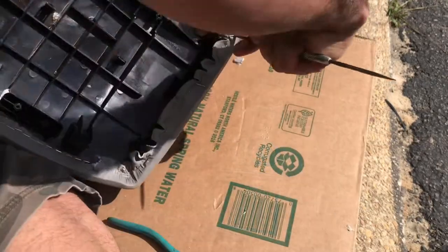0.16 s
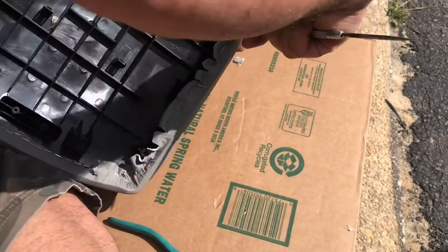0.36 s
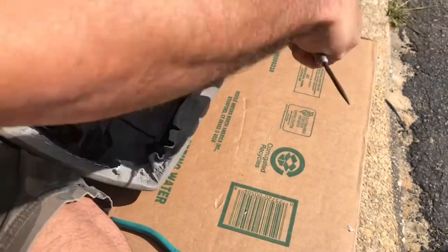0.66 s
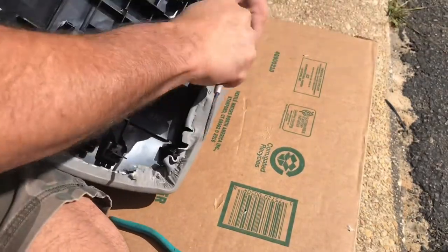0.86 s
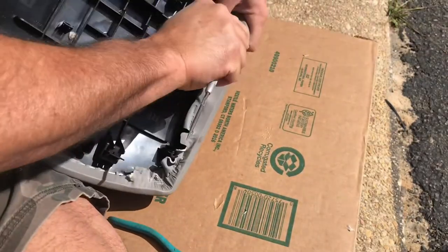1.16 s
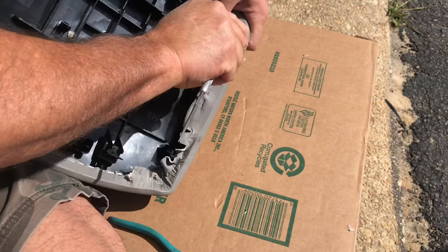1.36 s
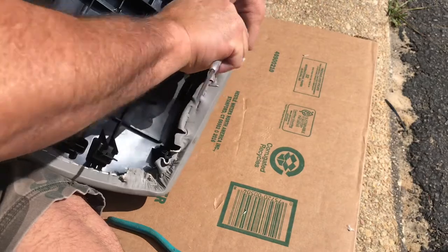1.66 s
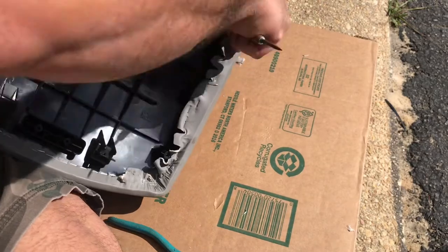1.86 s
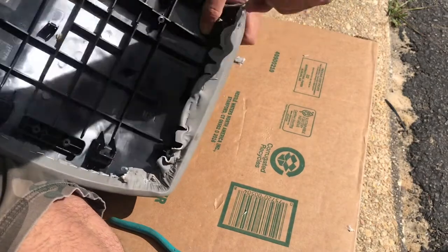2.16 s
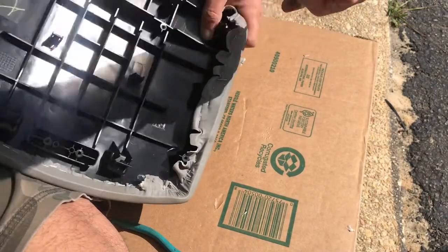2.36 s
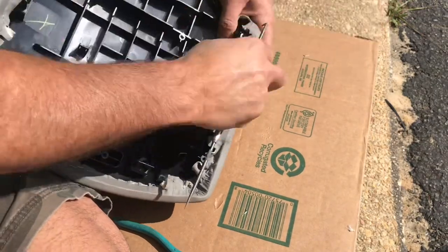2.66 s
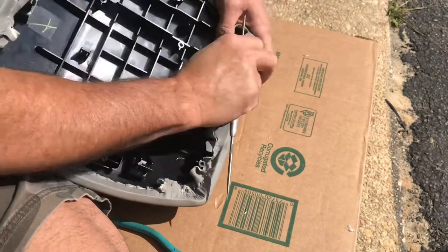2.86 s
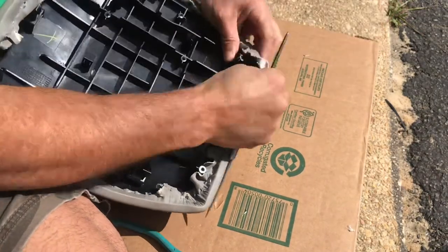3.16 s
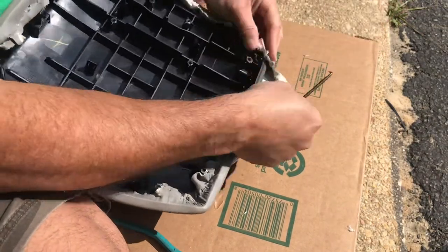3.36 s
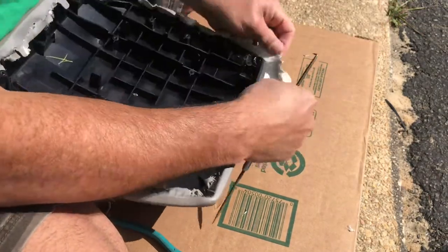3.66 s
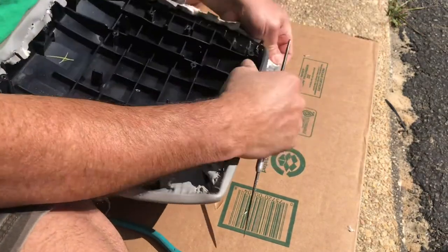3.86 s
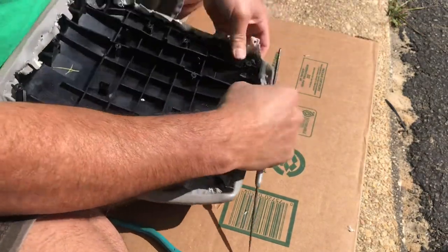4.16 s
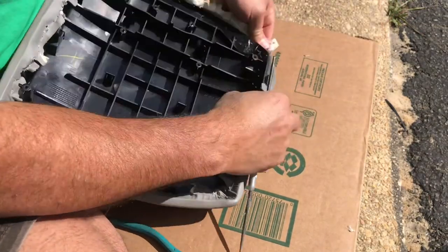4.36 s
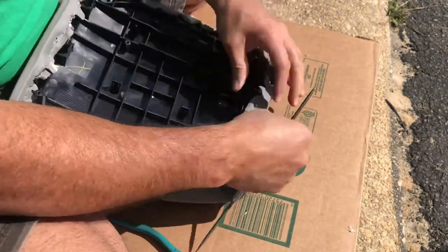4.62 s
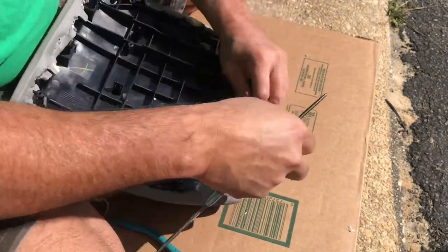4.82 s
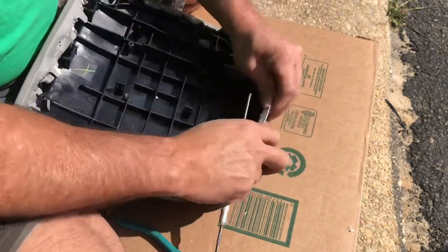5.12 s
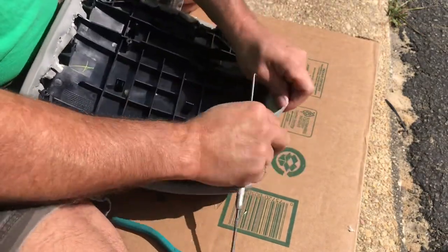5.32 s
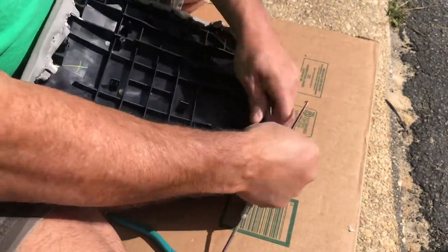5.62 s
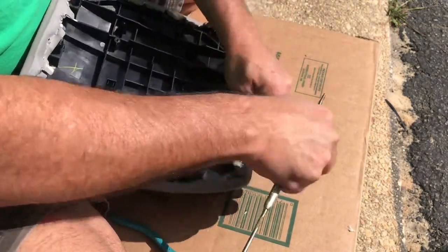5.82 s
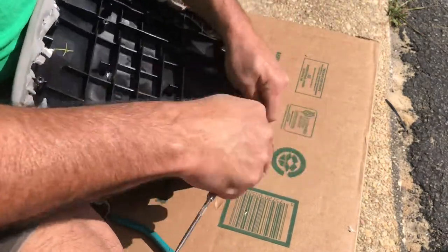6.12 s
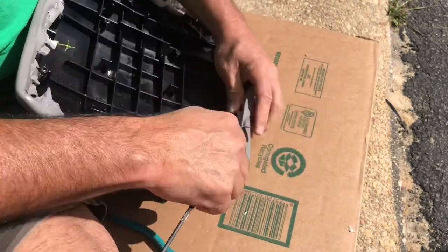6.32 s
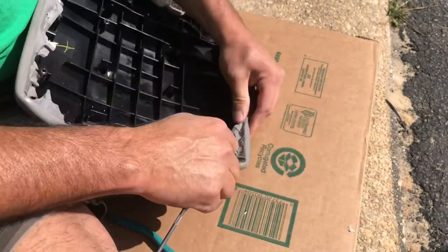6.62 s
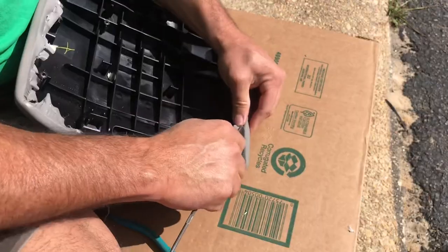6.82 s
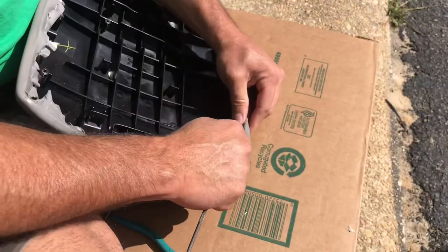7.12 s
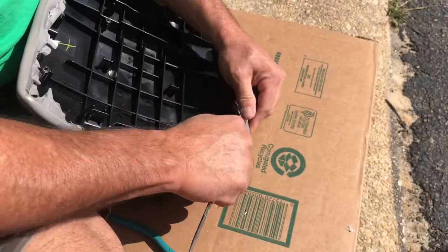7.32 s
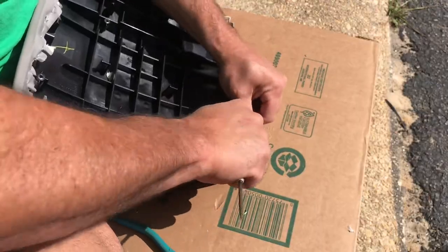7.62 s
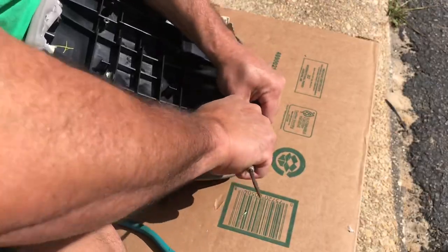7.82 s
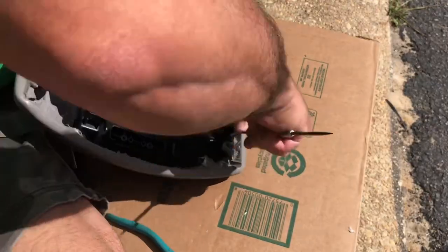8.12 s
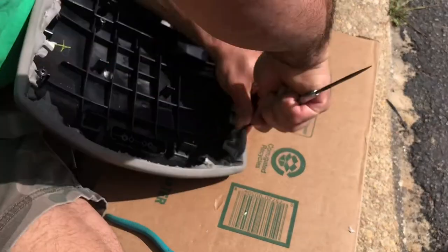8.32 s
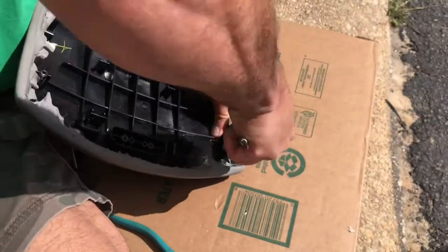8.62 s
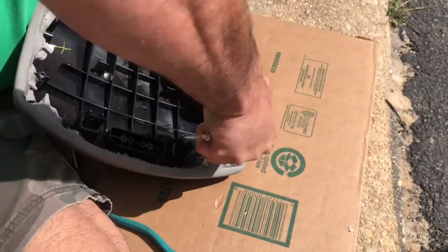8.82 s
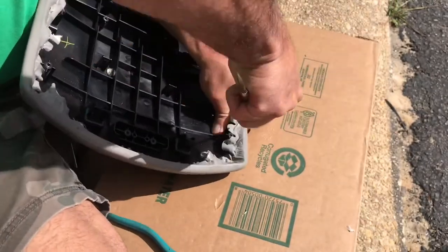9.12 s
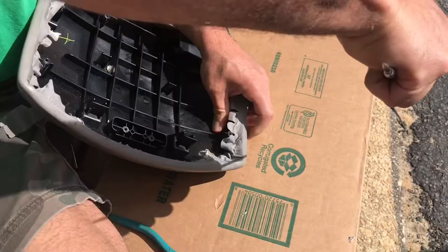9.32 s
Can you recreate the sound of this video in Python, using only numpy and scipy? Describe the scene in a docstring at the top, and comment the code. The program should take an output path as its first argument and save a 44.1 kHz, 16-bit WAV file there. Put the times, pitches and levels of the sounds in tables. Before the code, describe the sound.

Outdoors, close to the microphone, a metal pick works staples out of a hollow plastic seat pan on cardboard. A quick snap comes early, a denser cracking burst around two seconds, then light ticks, scrapes and soft rubbing. The pan judders down midway, and loud cracks and a thump come near nine seconds. A bird trills through the first four seconds, others chirp, over a low airy hush.

```python
"""A soft outdoor hush and shifting hands, as shaped noise, lie under it all; a small bird opens with a trill.
From the start distant twitters recur, each note a gliding sine; later nearer birds chirp in falling phrases.
A steel pick soon pries staples from a hollow plastic seat pan lying on cardboard, close by: sudden releases
ring the modes of the pan. Strokes over the rim scrape as stick-slip grains; stray touches fall at random.
Later, soft shoves make the pan wobble on the cardboard, and it lands twice, juddering the first time."""
import sys
import numpy as np
from scipy import signal
from scipy.fft import rfft, irfft, next_fast_len
from scipy.io import wavfile
from scipy.ndimage import uniform_filter1d

SR = 44100
rng = np.random.default_rng(int(sys.argv[2]) if len(sys.argv) > 2 else 0)


def inscribe(sig):
    """Save sig as 16-bit PCM at rate SR to the path in sys.argv[1].

    A 1-D sig is mono; a 2-D sig holds one channel per row.
    Samples are clipped to [-1, 1] before scaling.
    """
    pcm = np.round(np.clip(np.atleast_2d(sig).T, -1, 1) * 32767)
    wavfile.write(sys.argv[1], SR, pcm.astype(np.int16))


N = 418068
TIME = np.arange(N) / SR

# hands, knee and cardboard shifting, before each layer's trim:
# t/s, rumble level/dB, rub level/dB, vinyl rustle level/dB
HANDLING_LEVELS = [(0.0, -62, -64, -71), (0.63, -58.5, -60.5, -66), (1.08, -59.5, -64, -74.5),
                   (2.17, -67.5, -63.5, -75), (2.4, -73, -60, -61), (2.69, -64.5, -59, -71.5),
                   (3.67, -53, -60, -61), (3.93, -46, -60, -66), (4.59, -60, -57.5, -66),
                   (4.86, -51.5, -58.5, -71.5), (5.41, -52.5, -59.5, -67), (5.6, -45.5, -56.5, -63),
                   (5.81, -62, -54.5, -67.5), (6.15, -54.5, -55.5, -64.5), (7.02, -56, -63, -73),
                   (7.44, -58.5, -61, -72.5), (7.92, -48, -59.5, -74.5), (8.24, -53.5, -59, -75.5),
                   (8.95, -56.5, -59, -76), (9.08, -44, -58, -70.5), (9.48, -63, -58, -70)]
# modes of the ribs and panels of the pan: f/Hz, relative level/dB, decay time t60/s
PANEL_MODES = [(590.4, -1, 0.089), (672, 4.5, 0.028), (841, -4.5, 0.12), (1147, -7.5, 0.089),
               (1375, -10, 0.24), (1604, -4, 0.047), (1837, 4, 0.037), (2412, -5, 0.12), (3250, -10, 0.024),
               (3795, 0, 0.043), (4590, -1, 0.051), (12700, -16, .015)]
# chatter of a light contact of the steel tip
TICK_MS = 6.3


def gain_of(db):
    """Level definition: decibels to amplitude ratio."""
    return 10 ** (np.asarray(db) / 20)


def evened(x):
    """Normalization: scales a signal to rms 1."""
    return x / np.sqrt(np.mean(x ** 2) + 1e-20)


def add(mix, s, sound):
    """Superposition: mixes a sound in at time s."""
    part = mix[max(round(s * SR), 0):][:len(sound)]
    part += sound[:len(part)]


def band(x, lo_hz, hi_hz, order=3):
    """Causal band-pass filtering."""
    return signal.sosfilt(signal.butter(order, [lo_hz, hi_hz], "band", fs=SR, output="sos"), x)


def coloured(x, points):
    """Spectral shaping: weights the spectrum of x by a level curve over log frequency, at rms 1."""
    hz, db = np.transpose(points)
    size = next_fast_len(len(x), True)
    shape = np.interp(np.log(np.fft.rfftfreq(size, 1 / SR) + 1), np.log(hz), db)
    return evened(irfft(rfft(x, size) * gain_of(shape), size)[:len(x)])


def wander(per_s, t=TIME):
    """Random modulation: straight lines between normal random knots, per_s of them a second."""
    knots = rng.standard_normal(4000)
    return np.interp(t * per_s, np.arange(len(knots)), knots)


def grains(per_s, spread_db, smooth):
    """Stick-slip friction: sparse grains of uneven size over a bed of finer friction noise."""
    sizes = gain_of(spread_db * np.minimum(rng.exponential(1, N), 4)) * rng.standard_normal(N)
    slips = evened(sizes * (rng.random(N) < per_s / SR))
    return slips + smooth * rng.standard_normal(N)


def swells(rows):
    """Amplitude envelopes: one Gaussian rise and fall for each (middle s, length s, dB)."""
    out = np.zeros(N)
    for middle, length, db in rows:
        t = np.arange(-1.5 * length, 1.5 * length, 1 / SR)
        add(out, middle + t[0], gain_of(db) * np.exp(-(2 * t / length) ** 2))
    return out


def hush(db=-56.5):
    """Broadband ambience: distant traffic and leaves as shaped noise of slowly varying level."""
    # spectrum: f/Hz, relative level/dB
    hush_spectrum = [(25, -24), (50, -4.5), (110, 1.5), (200, -6), (300, -11.5), (500, -24), (1000, -26),
                     (2000, -26.5), (4500, -26), (6500, -27.5), (8000, -42), (10500, -58), (15500, -63)]
    return gain_of(db + 2.3 * wander(1.71)) * coloured(rng.standard_normal(N), hush_spectrum)


def handling(rumble_trim_db=1.5, rub_trim_db=0.0, rustle_trim_db=4.0):
    """Friction noise: cardboard rumbles, skin rubs and vinyl crinkles as the hands shift."""
    # spectra of the three layers: f/Hz, relative level/dB
    rumble_spectrum = [(20, -20), (35, 0), (55, 12), (90, -4), (160, -4), (300, -21.5), (600, -56),
                       (2000, -82)]
    rub_spectrum = [(60, -17), (200, 2.5), (320, 2.5), (450, -6.5), (700, -4.5), (1200, -5.5),
                    (3000, -10.5), (6000, -20), (16000, -30)]
    rustle_spectrum = [(500, -24), (3000, 2.5), (6000, 2), (8500, 1), (10400, -3), (12500, 0), (16000, -6)]
    s, *levels = np.transpose(HANDLING_LEVELS)
    rumble_db, rub_db, rustle_db = (np.interp(TIME, s, level) for level in levels)

    crinkle = grains(1500, 3., 1.8) * gain_of(1.6 * wander(40))
    rumble_gain = gain_of(rumble_db + rumble_trim_db + 2.6 * wander(13))
    rumble = rumble_gain * coloured(rng.standard_normal(N), rumble_spectrum)
    rub_gain = gain_of(rub_db + rub_trim_db + 2.8 * wander(35))
    rub = rub_gain * coloured(grains(700, 3.9, 1.5), rub_spectrum)
    rustle = gain_of(rustle_db + rustle_trim_db) * coloured(crinkle, rustle_spectrum)
    return rumble + rub + rustle


def whistle(hz, overtone_db):
    """Frequency modulation: one nearly pure bird note along a pitch curve, with a weak octave."""
    phase = 2 * np.pi * np.cumsum(hz) / SR
    tone = np.sin(phase) + gain_of(overtone_db) * np.sin(2 * phase)
    return tone * signal.windows.tukey(len(hz), .6)


def birds(trill_db=-51.5, trill_hz=6248.0, fade_db=-4.5, count=51):
    """Gliding tones with reflections: one bird trills, others chirp, and the yard returns a faint echo."""
    # phrases of falling chirps: t/s, notes, note spacing/s, level before the fade/dB, starting f/Hz,
    # fall/Hz, sag per note/Hz
    phrases = [(2.584, 1, .06, -47, 4380, 150, 0), (3.298, 3, 0.063, -48.5, 4520, 650, 72),
               (3.358, 1, .06, -46, 3240, 150, 0), (3.499, 2, 0.073, -52.5, 4100, 350, 118),
               (4.272, 2, .058, -56.5, 3960, 400, 3), (4.445, 2, 0.062, -50.5, 4330, 650, 278),
               (4.968, 3, .061, -48, 4390, 246, -43), (5.832, 3, .07, -48, 4470, 210, 5),
               (6.512, 2, .061, -51, 4420, 190, 0), (7.105, 2, 0.079, -58, 4610, 230, 288),
               (8.649, 1, .06, -53.5, 4450, 150, 0)]
    trill_start_s, trill_step_s = .0072, .0821
    # the further a chirp falls, the longer it lasts and the more it fades
    chirp_s, fall_hz_per_s, fall_hz_per_db = 0.0177, 25500, 90
    wall_s, wall_db = 0.016, -16

    out = np.zeros(N)
    u = np.linspace(0, 1, int(0.02 * SR))
    hook_hz = 800 * np.exp(-u / 0.1) + 180 * u ** 2
    for k in range(count):
        hz = trill_hz * (1 + 0.0038 * rng.standard_normal()) + hook_hz
        gain = gain_of(trill_db + fade_db * k / count + rng.normal(0, 1))
        add(out, trill_start_s + k * trill_step_s, gain * whistle(hz, -21))

    for s, notes, step_s, db, hz, fall_hz, sag_hz in phrases:
        u = np.linspace(0, 1, int((chirp_s + fall_hz / fall_hz_per_s) * SR))
        fallen_hz = fall_hz * u ** 2
        for k in range(round(notes)):
            level_db = db + rng.normal(0, 2.0) - fallen_hz / fall_hz_per_db
            add(out, s + k * step_s, gain_of(level_db) * whistle(hz - k * sag_hz - fallen_hz, -29))

    # one echo off a wall, then a diffuse decaying tail
    add(out, wall_s, gain_of(wall_db) * out)
    t = np.arange(SR // 2) / SR
    echo = rng.standard_normal(len(t)) * gain_of(-60 * t / 0.32)
    return out + gain_of(-14.5) * signal.oaconvolve(out, echo / np.linalg.norm(echo))[:N]


def far_birds(hz=4630.0, step_s=.047, count=3):
    """Frequency modulation: a distant bird twitters in short runs of notes with an arched pitch."""
    # runs: t/s, level/dB
    twitters = [(.02, -65), (1.56, -64), (1.85, -64), (4.749, -63), (5.13, -64), (6.799, -65), (7.03, -63),
                (7.779, -63), (8.18, -68), (8.7, -66), (9.24, -67)]
    out = np.zeros(N)
    u = np.linspace(0, 1, int(0.042 * SR))
    for start, db in twitters:
        for k in range(count):
            note = whistle(hz + rng.normal(0, 43) - 600 * (u - .4) ** 2, -35)
            add(out, start + k * step_s, gain_of(db + rng.normal(0, 1.3)) * note)
    return out


def resonate(x, hz, width_hz):
    """Resonance: one second-order peak of gain 1."""
    return signal.lfilter(*signal.iirpeak(hz, hz / width_hz, fs=SR), x)


def ringing(modes, t, detune):
    """Modal decay: damped sines; the grip and the place of the blow shift each one a little."""
    out = np.zeros(len(t))
    for hz, db, t60 in modes:
        envelope = gain_of(db - 60 * t / t60 + 2 * rng.standard_normal())
        out += envelope * np.sin(2 * np.pi * hz * (1 + detune * rng.standard_normal()) * t)
    return out


def struck(x, db, first_s):
    """Onset level: sets the rms of the first moments of a blow."""
    return gain_of(db) * x / np.sqrt(np.mean(x[:int(first_s * SR)] ** 2) + 1e-20)


def spot(s):
    """Local resonance: pitches of the panel and rib nearest to the pick as it moves along the rim."""
    # stations of the pick, before the scatter: from t/s, panel f/Hz, rib f/Hz
    stations = [(0, 495, 2820), (1.5, 575, 1680), (2.1, 524, 2560), (2.22, 610, 1800), (2.8, 1045, 2280),
                (7.2, 1054, 3095)]
    scatter = 0.12  # share by which each blow shifts the two pitches
    nearest = [pitches for start, *pitches in stations if start <= s] or [stations[0][1:]]
    return np.array(nearest[-1]) * np.exp(scatter * rng.standard_normal(2))


def click(thump_db, knock_db, crack_db, tick_db, chatter_ms, panel_hz, rib_hz,
          spike=0.96, ring=0.0061, scatter_db=-20, scatter_t60=0.09,
          yard_db=-44, yard_t60=0.28, held_s=0.012):
    """Impulse excitation: a sudden release and brief steel chatter ring panel and rib, and rock the pan."""
    # modes of the whole pan rocking on the cardboard: f/Hz, relative level/dB, decay time t60/s
    pan_modes = [(156.4, 2, 0.2), (186.5, -0.5, 0.055), (230, -6.5, 0.1), (303, 1, 0.15), (344, -14, 0.08)]
    # a light blow raises the band of rocking noise above a heavy one's, by up to this share
    heavy_db, light_db, light_lift = -30.5, -42, 0.39
    # the hand damps panels and ribs
    knock_held_s, crack_held_s = 0.058, 0.09

    t = np.arange(SR // 6) / SR
    chatter, scatter, yard, grit = rng.standard_normal((4, len(t)))
    force = chatter * np.exp(-3 * t / (chatter_ms / 1000)) * (1 - np.exp(-t / 0.00079))
    release = (t - .0006) / .00005
    # the cleaner the break, the sharper its spike
    force += spike * 6 / chatter_ms * (1 - release) * np.exp(-release ** 2)
    # the staple crackles on in its hole and waves bounce among the ribs, then faintly around the yard
    crackle = evened(scatter * gain_of(3.5 * evened(uniform_filter1d(grit, 70))))
    force += crackle * gain_of(scatter_db - 60 * t / scatter_t60)
    force += yard * gain_of(yard_db - 60 * t / yard_t60)
    shell = force + ring * signal.fftconvolve(force, ringing(PANEL_MODES, t, 0.0064))[:len(t)]

    # the hand soon stills a light bump; a heavy one keeps the pan rocking
    rocking = np.exp(-t / (held_s * (1 + gain_of(2 * (thump_db + 36.5)))))
    lift = 1 + light_lift * np.clip((thump_db - heavy_db) / (light_db - heavy_db), 0, 1)
    pan_tones = ringing(pan_modes, t, 0.019) * (1 - np.exp(-t / 0.0018))
    pan_noise = 16 * band(scatter, 92 * lift, 270 * lift) * gain_of(-60 * t / 0.17)
    thump = rocking * (pan_tones + pan_noise)

    panel = shell + 1.9 * resonate(shell, panel_hz, 300)
    knock = band(panel, 378, 1760) * np.exp(-t / knock_held_s)
    rib = shell + 1.7 * resonate(shell, rib_hz, 1020) + 3.6 * resonate(shell, rib_hz, 110)
    crack = band(rib, 1920, 4900, order=2) * np.exp(-t / crack_held_s)
    steel = shell + 2.5 * resonate(shell, 6450, 3200) + 0.51 * resonate(shell, 12100, 2000)
    tick = band(steel, 7400, 19845, order=2)
    return (struck(thump, thump_db, 0.025) + struck(knock, knock_db, 0.0044)
            + struck(crack, crack_db, 0.0061) + struck(tick, tick_db, 0.0064))


def prying():
    """Sudden release of strain: staples slip and snap in the plastic; the tip ticks on their steel."""
    # staples slipping and snapping: t/s, pan thump level/dB, panel knock level/dB, crack level/dB,
    # metal tick level/dB, chatter/ms
    snaps = [(.174, -58, -44, -49.5, -60, 5.6), (0.2707, -62, -47, -40, -41.5, 1.7),
             (0.4063, -72, -52, -39.5, -43, 13), (.411, -69, -42, -46, -40, 3.8),
             (.433, -40, -34, -31.5, -31.5, 6), (.444, -68, -37, -31, -28, 5.1),
             (0.4653, -33.5, -21, -21.5, -25, 4.6), (.5011, -40, -34, -42.5, -40, 1.3),
             (1.7736, -46, -30, -32.5, -40.5, 5.8), (1.8117, -53, -37.5, -50, -53, 6.9),
             (1.976, -50, -51.5, -55, -63, 3.5), (2.19, -43.5, -34.5, -42.5, -44, 17),
             (2.2037, -48, -21, -26.5, -30.5, 9.3), (2.2251, -49, -33, -27, -30, 6.8),
             (2.237, -45, -27, -24.5, -34, 8.5), (2.2419, -37, -27, -21.5, -25.5, 12),
             (2.2502, -48, -38, -29.5, -27, 1.5), (2.382, -46.5, -35.5, -42.5, -43.5, 5.1),
             (2.9028, -63, -50.5, -46.5, -60, 4.8), (3.034, -63, -46, -50, -58, 7.5),
             (3.0625, -43.5, -49, -42, -46, 13), (3.205, -47, -46.5, -46, -70, 5),
             (3.907, -71, -49.5, -45, -52.5, 13), (3.958, -60, -47, -37, -50.5, 3.6),
             (4.134, -45, -54, -48, -42.5, 1.9), (4.327, -64, -39.5, -41.5, -48, 6.9),
             (5.059, -46, -49.5, -40.5, -48, 13.5), (5.402, -43.5, -40, -45.5, -56, 7.3),
             (5.4543, -47, -51, -50.5, -52.5, 9.9), (5.6527, -62, -54, -48.5, -69, 8.6),
             (5.7861, -45, -43, -47, -54, 9.4), (6.5629, -62, -45, -57, -72, 8.4),
             (6.7272, -41.5, -42.5, -49, -51, 5.4), (7.497, -66, -64, -47, -55.5, 7.1),
             (7.698, -49, -47.5, -57, -58, 11), (8.6031, -44.5, -48, -45.5, -66, 9.5),
             (8.9084, -25.5, -23.5, -14, -27.5, 3.8), (8.9472, -29.5, -30, -34, -46, 12),
             (8.9634, -29, -30, -36, -48, 15), (8.9744, -28, -30.5, -30, -33.5, 5.8),
             (8.993, -42, -31, -28, -37, 2.8), (9.1924, -25.5, -25.5, -27.5, -31.5, 9.4),
             (9.431, -47.5, -45, -47, -60, 3.9)]
    # the steel tip skating over a staple: t/s, level/dB
    tip_ticks = [(.229, -54.5), (2.3518, -51), (3.4155, -41), (4.294, -51), (5.5224, -34), (5.534, -36),
                 (5.542, -36), (5.7027, -35), (5.7112, -35), (8.006, -51.5), (8.554, -51.5),
                 (9.3925, -50.5)]
    beside_tick_db = np.array((-17.5, -15.5, -10.5))  # thump, knock and crack
    out = np.zeros(N)
    for s, *blow in snaps:
        add(out, s, click(*blow, *spot(s)))
    for s, db in tip_ticks:
        add(out, s, click(*(db + beside_tick_db), db, TICK_MS, *spot(s)))
    return out


def touches(count=18):
    """Random impacts: fingers and pick graze the pan, more often and harder while the hands rub."""
    touch_db, spread_db = 3, 2.5  # beside the rub
    voice_db = np.array((2.5, -3.5, -3, -6.5))  # thump, knock, crack, tick
    out = np.zeros(N)
    s, _, rub_db, _ = np.transpose(HANDLING_LEVELS)
    effort_db = np.interp(TIME, s, rub_db)
    chance = gain_of(effort_db) ** 4
    for at in rng.choice(N, count, p=chance / chance.sum()):
        db = effort_db[at] + touch_db + spread_db * rng.standard_normal()
        add(out, TIME[at], click(*(db + voice_db), TICK_MS, *spot(TIME[at])))
    return out


def scrapes(ring=0.0058, spread_db=2.5, smooth=0.52, judder_db=2.0):
    """Stick-slip: dense friction grains sound through the panels; a sharp stroke trades body for rasp."""
    # pick and vinyl dragging over the rim: middle t/s, length/s, level/dB,
    # sharpness/dB (rasp gains it, body loses it)
    strokes = [(.452, 0.026, -48.5, 15), (.507, 0.061, -55, 5), (.73, 0.095, -62, 1),
               (3.06, 0.053, -50.5, 0.5), (3.388, 0.16, -58, 2.5), (3.796, 0.04, -56.5, -2),
               (4.111, 0.1, -52.5, 2), (4.455, 0.067, -58.5, 7), (4.58, 0.15, -50.5, -9),
               (4.623, 0.025, -37, 4), (4.648, 0.029, -59, -18.5), (4.92, .034, -53.5, 3),
               (5.057, 0.027, -51, 1), (5.394, 0.033, -50.5, -0.5), (5.519, 0.095, -49, 1),
               (5.731, .09, -50.5, 0), (6.099, 0.096, -45, -6.5), (6.285, 0.042, -50.5, -2),
               (6.335, 0.051, -44, 3), (6.455, 0.035, -54.5, 1), (6.755, 0.069, -54.5, -2.5),
               (8.008, .16, -61, 1.5), (8.618, 0.03, -45.5, 4)]
    fizz_db = -9.5  # treble beside the level of the stroke
    friction = grains(2500, spread_db, smooth) * gain_of(judder_db * wander(160))
    panels = ringing(PANEL_MODES, np.arange(4096) / SR, 0.015)
    friction = friction + ring * signal.oaconvolve(friction, panels)[:N]

    body = evened(band(friction, 580, 1360, order=2))
    rasp = evened(band(friction, 1035, 2880, order=2) + 0.1 * band(friction, 4000, 5300))
    fizz = evened(band(friction, 7200, 12800, order=2))
    s, length, db, sharp_db = np.transpose(strokes)
    return (body * swells(zip(s, length, db - sharp_db))
            + rasp * swells(zip(s, length, db + sharp_db))
            + fizz * swells(zip(s, length, db + fizz_db)))


def shoves(drift=.2, uneven_db=2.5):
    """Mass on a soft spring: dull pushes make the pan wobble briefly on the cardboard."""
    # pushes: middle t/s, length/s, mean level/dB, centre of the drifting f/Hz
    pushes = [(2.753, .088, -48.5, 160), (3.871, 0.18, -36.5, 67.2), (4.037, 0.11, -36.5, 72),
              (4.262, 0.35, -48.5, 100), (4.524, 0.045, -25.5, 200.6), (4.565, 0.14, -30, 75),
              (5.137, 0.03, -39, 80), (5.505, 0.063, -42.5, 86), (6.113, 0.085, -41.5, 307.4),
              (6.294, 0.078, -45.5, 300), (6.453, 0.11, -40, 70.7), (6.753, 0.082, -44, 283),
              (7.417, 0.028, -45, 196), (7.692, 0.041, -42, 163), (7.736, 0.067, -35.5, 59.6),
              (8.522, .13, -46, 85), (8.612, 0.064, -38.5, 189.4), (8.967, 0.064, -31, 135),
              (9.21, 0.026, -17, 163)]
    out = np.zeros(N)
    for s, length, db, hz in pushes:
        t = np.arange(-1.5 * length, 1.5 * length, 1 / SR)
        drifting_hz = hz * np.exp(drift * wander(110, t - t[0]))
        wobble = np.sin(2 * np.pi * np.cumsum(drifting_hz) / SR)
        gain = gain_of(db + uneven_db * wander(80, t - t[0]))
        add(out, s + t[0], gain * np.exp(-(2 * t / length) ** 2) * wobble)
    return out


def drops():
    """Inelastic impact: the pan lands twice; the first time it judders, each bounce weaker and duller."""
    # landings on the cardboard: t/s, first thump level/dB, number of impacts
    landings = [(4.4909, -21, 5), (9.204, -28.5, 1)]
    beside_thump_db = np.array((-3, -28, -25.5))  # knock, crack and tick
    chatter_ms, panel_hz = 13.6, 705
    bounce_s, loss_db, dulling_db = .023, 4, 4
    out = np.zeros(N)
    for s, first_db, impacts in landings:
        for k in range(round(impacts)):
            db = first_db - k * loss_db
            upper_db = db + beside_thump_db - k * dulling_db
            add(out, s + k * bounce_s, click(db, *upper_db, chatter_ms, panel_hz, spot(s)[1]))
    return out


def scene():
    """Superposition: the work close by, the yard behind it."""
    work = prying() + drops() + touches() + scrapes() + shoves() + handling()
    yard = birds() + far_birds() + hush()
    return (work + yard)[None]


def record(dry):
    """Transduction: the microphone sheds the deepest bass, clips at full scale and is band-limited."""
    edge_hz = 16100
    x = signal.sosfilt(signal.butter(2, 32, "high", fs=SR, output="sos"), dry)
    x = np.clip(x, -1, 1)
    return signal.oaconvolve(x, signal.firwin(301, edge_hz, window=("kaiser", 9), fs=SR)[None], "same")


dry = scene()
out = record(dry)
inscribe(out)
```